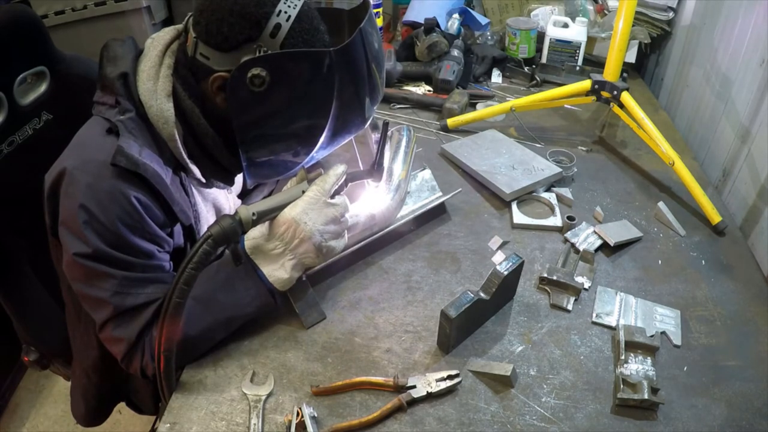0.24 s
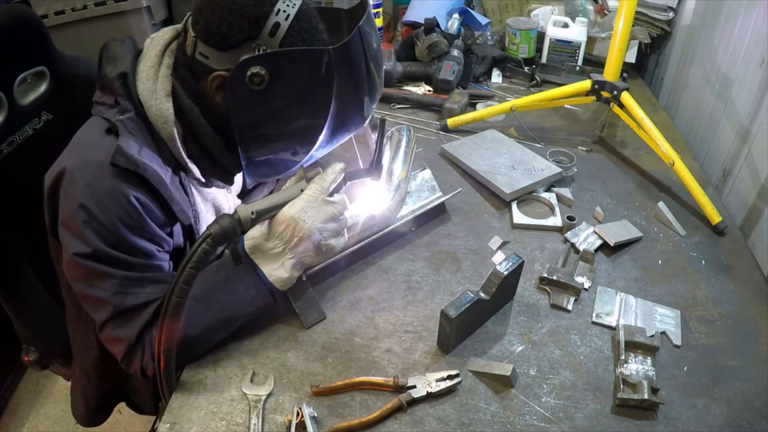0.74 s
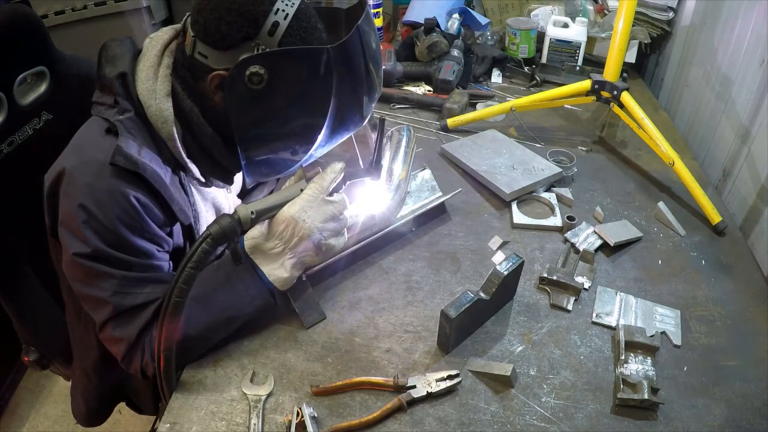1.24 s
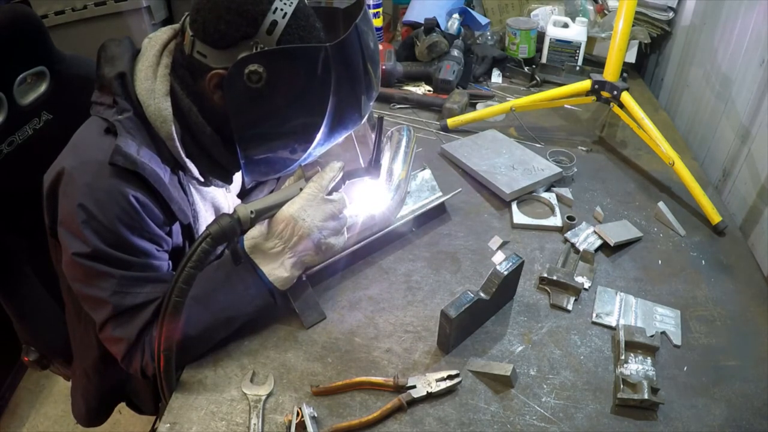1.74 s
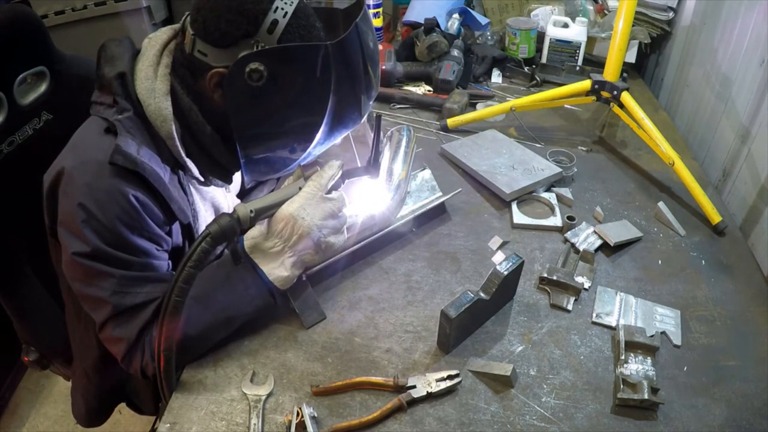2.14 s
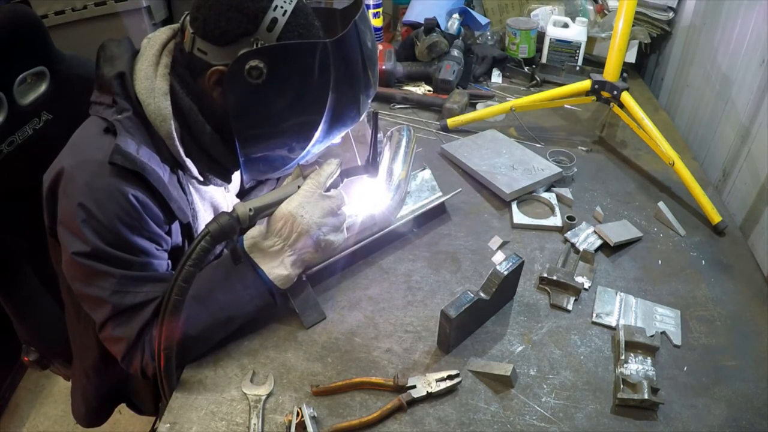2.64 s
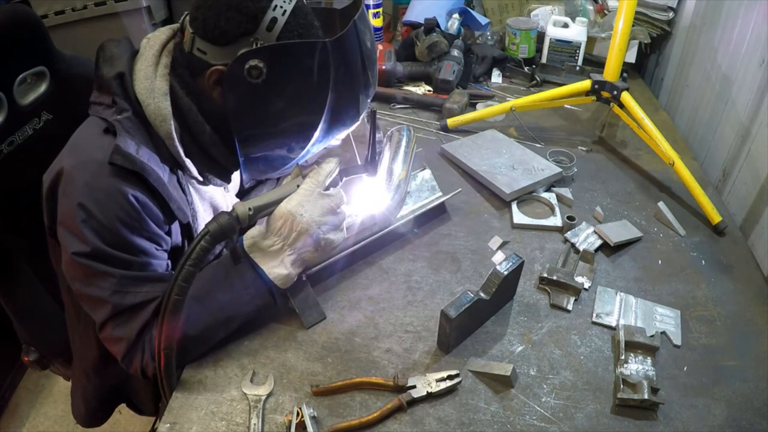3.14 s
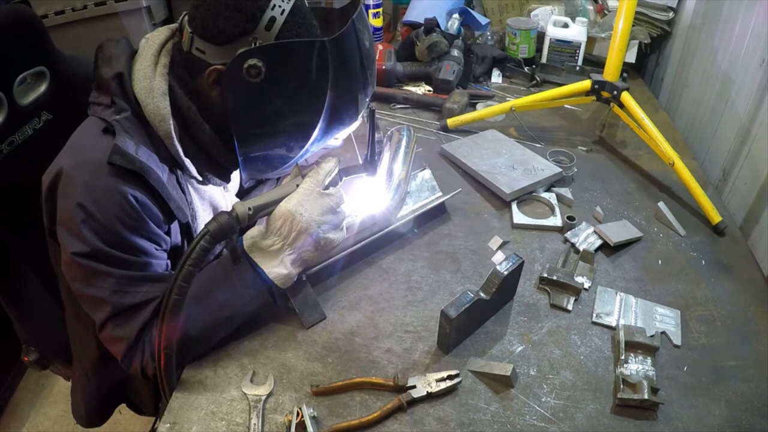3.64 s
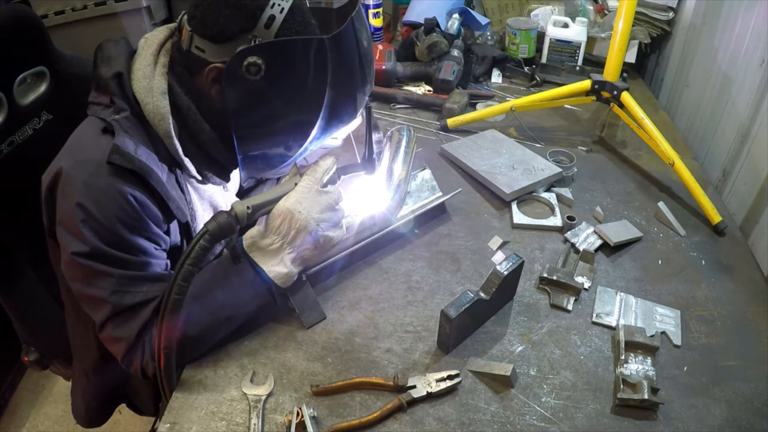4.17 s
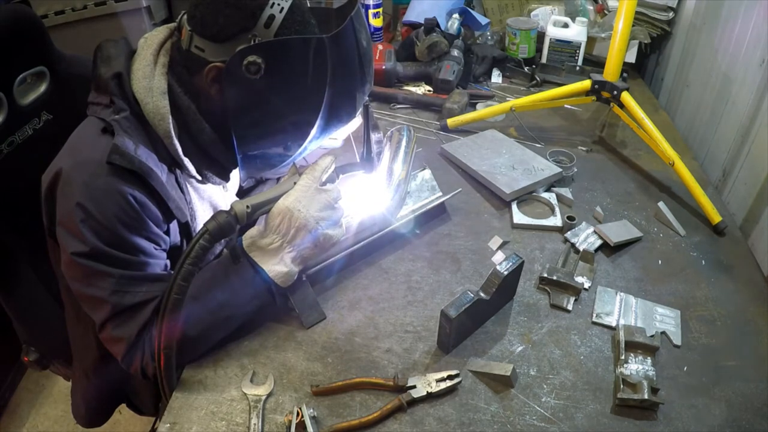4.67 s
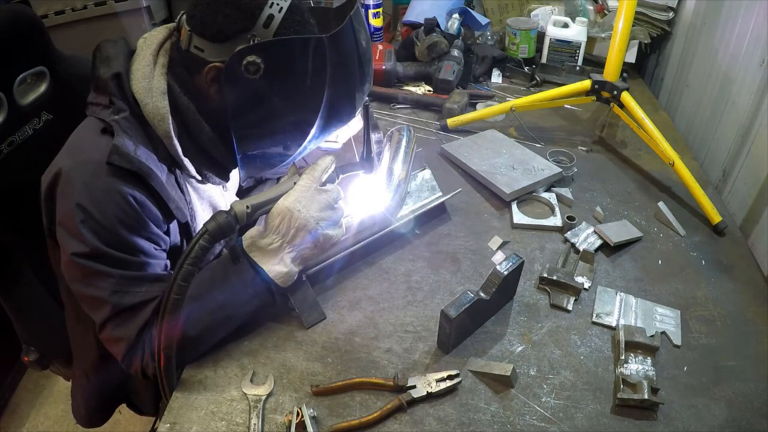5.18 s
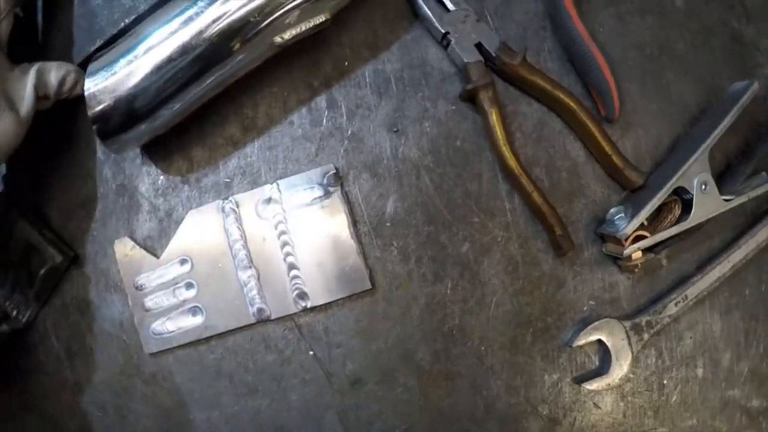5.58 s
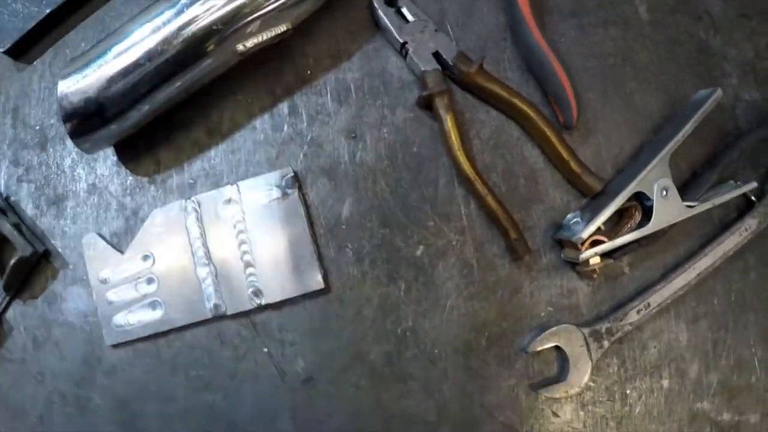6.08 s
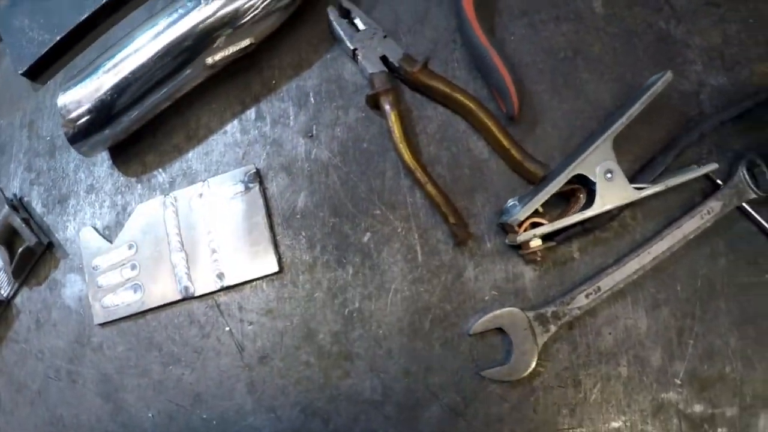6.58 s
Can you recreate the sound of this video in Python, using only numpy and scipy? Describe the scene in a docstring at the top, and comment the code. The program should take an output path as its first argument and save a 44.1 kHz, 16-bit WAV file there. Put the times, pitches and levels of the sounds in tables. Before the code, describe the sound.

Loud raspy arc-welding buzz with crackling spits and fan whir stops dead, followed by bumps, a short metal scrape, bright clinks and a faint ping.

```python
"""A hard AC TIG buzz opens the scene, sputtering over the air and blade tones of the welder's cooling fan.
Each current reversal is a click that excites resonances around the arc, with an echo off the helmet;
restless spells of the puddle make the restrikes uneven and crack with bursts of bright noise.
The sound of arc and fan ends abruptly; gloves and bumps follow, as enveloped noise, and a tube scrapes over
the bench as grainy noise. Its rim clinks and a tool pings faintly, both as sums of decaying sines."""
import sys
import numpy as np
from scipy import signal
from scipy.fft import rfft, irfft
from scipy.io import wavfile
from scipy.ndimage import map_coordinates

SR = 44100
rng = np.random.default_rng(int(sys.argv[2]) if len(sys.argv) > 2 else 0)


def digitize_waveform(pressure):
    """Quantize a signal to 16-bit integers and store it at the path in sys.argv[1].

    Rows of a 2-D input are taken as channels; values are limited to [-1, 1].
    """
    field = np.atleast_2d(pressure).T
    bounded = np.clip(field, -1, 1)
    quanta = np.round(bounded * 32767).astype(np.int16)
    wavfile.write(sys.argv[1], SR, quanta)


N = 300446
T = np.arange(N) / SR

# resonances around the arc, each strongest when the torch passes one place on the seam:
# f/Hz, width/Hz, level/dB, strongest at t/s, time from there to half strength/s, signed gain factor
ARC_RESONANCES = [(918, 119, 5.5, 2.5, 5.7, 1), (1380, 56, 5, 2, 3.8, -1.06),
                  (1788.6, 31, 11.5, 2, 5.4, 0.93), (2080, 26, 7.5, -2.5, 5.3, -1.5),
                  (2650.4, 30.8, 17, 1, 7.1, 1), (2700, 188, 14, 1.5, 5.7, -0.93),
                  (3324, 131, 12.5, 2.5, 3.75, 0.93), (3492, 510, 4.5, 3, 3.3, -1.06),
                  (4091, 171, 15.5, 3.5, 5.3, 0.97), (4099.4, 53, 18, 2.5, 8.3, -1),
                  (4626, 42, 19.0, 4.5, 1.95, 1), (4828, 214, 11.5, 5, 3.1, -0.99),
                  (5046, 59, 12.5, 5, 3.9, 0.95), (5670, 45, 7.5, -1, 4.2, -1.02),
                  (6228, 45, 12, 9.5, 10.5, 0.93), (6910, 134, 9.5, 4.0, 1.9, -1.06),
                  (7870, 35, 13.5, 2.5, 1.65, 0.95), (8524, 32, 11, 1, 6.2, -0.94),
                  (9096, 30, 15.5, 3.5, 5.5, 0.97), (9880, 52, 14, 8.5, 8, -1.14),
                  (10163, 39, 10.5, 0.0, 1.9, 0.96), (10910, 33, 14, 0.5, 0.96, -1.1),
                  (11120, 108, 16, 5.5, 3.2, 0.81), (11847, 45, 18.5, 3, 2.1, -0.92),
                  (12350, 250, 4, 0.5, 3.8, 0.64), (12200, 2300, -5.5, 3, 3.3, 0.79),
                  (12700, 120, 0, 10.5, 6, -0.75), (13250, 47, 12, 5.4, 8.0, 0.89),
                  (14200, 160, 9, 3, 2, -0.96), (14690, 43, 16.5, 0, 4.2, -1.07)]
# spells in which the puddle is restless and the arc sputters: start t/s, length/s, level/dB
RESTLESS_SPELLS = [(0.021, 0.75, -26), (0.893, 0.36, -27), (1.587, 0.62, -26), (2.262, 0.373, -26),
                   (2.8, .1, -35), (3.07, .1, -29), (3.326, 0.066, -27.5), (3.674, .3, -28.5),
                   (4.782, 0.069, -40), (4.947, 0.042, -27.5)]
# single restrikes that snap at a level of their own: t/s, level/dB
HARD_SNAPS = [(.105, -19.5), (1.589, -18), (2.886, -27), (3.316, -25), (3.33, -21), (3.394, -19)]
# bright crack of a restrike, and the duller wash of its reflections: f/Hz, level/dB
CRACK_COLOUR = [(1500, -17.0), (3000, 1.0), (7500, -10), (11000, -3), (14500, 9.0), (16500, -25)]
WASH_COLOUR = [(1000, -20.0), (2200, -6), (4000, -1.5), (7000, 1.5), (12000, 3.5), (15000, -13.0),
               (16500, -20.0)]
# fan blade tone and its multiples: multiple of the blade rate, level/dB
BLADE_TONES = [(1, -38.5), (2, -45.5), (4, -48.5), (5, -46)]
# air through the welder's case: f/Hz, level/dB
FAN_AIR_COLOUR = [(60, -11), (130, -14.5), (180, 2.5), (250, -1.5), (345, -12), (440, -7.5), (515, -9),
                  (620, -0.5), (750, -9), (860, -7), (1200, -20.5), (1600, -21), (2200, -17), (9000, -43)]
# rumble of the workshop: f/Hz, level/dB
RUMBLE_COLOUR = [(20, -7.5), (30, 1), (45, -5), (65, -21.5), (120, -22.5), (300, -34)]
# slow swells of that rumble: t/s, level/dB
RUMBLE_SWELLS = [(0, -43), (.8, -46.5), (1.9, -37.5), (3.1, -47.5), (4.3, -50), (5.1, -41), (6.8, -46.5)]
# hiss of the workshop: f/Hz, level/dB
HISS_COLOUR = [(100, 6.5), (300, -8.5), (1000, -9.5), (4000, -10), (10000, -23), (15000, -25)]
# dull bumps of hands and tube: t/s, level/dB, f/Hz
DULL_BUMPS = [(5.410, -35, 500), (5.445, -37, 1500), (5.465, -54, 1200), (5.513, -42, 400),
              (5.598, -29, 400), (6.109, -46, 700), (6.168, -37, 756), (6.265, -42, 810),
              (6.311, -45, 1500), (6.644, -45, 1000)]
# strokes of the gloves on the metal: start t/s, length/s, level/dB
GLOVE_STROKES = [(5.433, .028, -48), (6.1, .32, -51.5), (6.65, .2, -51)]
# leather on metal: f/Hz, level/dB
GLOVE_COLOUR = [(150, 8), (400, -3.5), (900, -3), (2000, -7), (5000, -8), (8000, -16), (14000, -31)]
# touches on the tool: t/s, level/dB
TOOL_TOUCHES = [(6.385, -45), (6.393, -41)]
# modes of the tool: f/Hz, t60/s, level/dB
TOOL_MODES = [(2080, 0.72, -13), (2030, 0.092, 10), (3090, .12, -3), (4915, .17, -9), (6471, .22, -14)]
# boom of the bench top under the sliding tube: f/Hz, level/dB
BOOM_COLOUR = [(80, -26), (130, -5), (170, 3), (240, -2.5), (330, -17), (600, -30)]
# scrape of metal on metal: f/Hz, level/dB
SCRAPE_COLOUR = [(250, 4), (500, -3), (900, 3), (1500, -2.5), (2700, -4.5), (4200, -12.5), (7000, -21),
                 (10000, -47), (14000, -39)]
# modes of the tube: f/Hz, t60/s, level/dB
TUBE_MODES = [(2390, 0.033, 7), (2680, 0.051, -6), (3000, 0.043, 0), (3890, 0.093, 4.5), (5130, 0.058, -11),
              (5660, 0.19, -5.5), (6761, 0.096, -17), (7100, 0.038, 2), (9900, 0.14, -13),
              (11300, .18, -27), (12890, .2, -19), (13800, .15, -16)]
# the tube's rim striking the bench: t/s, ring level/dB, crack level/dB, most excited f/Hz
RIM_STRIKES = [(5.650, -15.5, -21.5, 2660), (5.685, -23, -31, 2850), (5.698, -13, -19, 7700),
               (5.727, -18, -16.5, 5600), (5.752, -27, -28, 4970), (5.828, -42, -31, 3900),
               (5.852, -35, -31, 4220)]
# crack of rim on bench: f/Hz, level/dB
STRIKE_COLOUR = [(600, -19), (1800, -10), (2700, 1.5), (3800, -2), (6000, -4.5), (9000, -18), (14000, -40)]

AC_HZ = 202.735
CLEANING_SHARE = .2697  # part of each cycle between the weak reversal and the restrike
WELDING_ENDS_S, BACKGROUND_RETURNS_S = 5.351, 5.4
# one shove of the tube: it starts, gathers speed, slides on and stops
SHOVE_S, FULL_SPEED_S, STOP_S = 5.51, 5.66, 5.845


def undb(db):
    """Decibels to gain."""
    return 10 ** (np.asarray(db) / 20)


def unit(x):
    """Scale to rms 1."""
    return x / np.sqrt(np.mean(x ** 2))


def noise():
    """White noise."""
    return rng.standard_normal(N)


def walk(rate):
    """Random drift: straight lines between normal draws, rate of them a second."""
    points = rng.standard_normal(N)
    return np.interp(T * rate, np.arange(N), points)


def colour(x, points):
    """Weight the spectrum of x by (f/Hz, level/dB) points, at rms 1."""
    hz, db = np.transpose(points)
    f = np.maximum(np.arange(N // 2 + 1) * SR / N, 1)
    # roll off an octave outside the outer points
    low_end = 1 + (hz[0] / 2 / f) ** 2
    high_end = 1 + (f / hz[-1] / 2) ** 2
    gain = undb(np.interp(np.log(f), np.log(hz), db)) / np.sqrt(low_end * high_end)
    return unit(irfft(rfft(x) * gain, N))


def resonate(x, hz, width):
    """Two-pole resonance, gain 1 at the centre."""
    b, a = signal.iirpeak(hz, hz / width, fs=SR)
    return signal.lfilter(b, a, x + 1e-18)  # the offset keeps the decay out of denormal numbers


def highpass(x, order, hz):
    """Butterworth high-pass."""
    return signal.sosfilt(signal.butter(order, hz, "highpass", fs=SR, output="sos"), x)


def hump(t, middle, width):
    """A smooth rise to 1 and fall around one moment."""
    return np.exp(-((t - middle) / width) ** 2)


def held(t, start, length, attack, release):
    """Envelope that reaches 1 at the start, holds for the length and decays with time constant release."""
    rise = np.clip(1 + (t - start) / attack, 0, 1)
    return rise * np.exp(-np.maximum(t - start - length, 0) / release)


def fade(start, t60):
    """Sudden onset and exponential decay."""
    return (T >= start) * np.exp(-np.log(1000) * np.clip((T - start) / t60, 0, 10))


def reflections(x, t60):
    """Dense, short echo of bench and walls: convolution with decaying noise."""
    tail = noise() * fade(0.00204, t60)
    return signal.fftconvolve(x, tail[:SR] / np.sqrt(np.sum(tail ** 2)))[:N]


def ring(start, modes, weights):
    """Decaying modes of a struck object, as one second of sines."""
    t, out = T[:SR], np.zeros(N + SR)
    first = int(start * SR)
    for (hz, t60, db), weight in zip(modes, weights):
        decay = undb(db - 60 * t / t60)
        out[first:first + SR] += weight * decay * np.sin(2 * np.pi * hz * t)
    return out[:N]


def clicks(times, sizes, size=8):
    """Sharp clicks placed between the samples, as windowed sincs."""
    at = np.floor(times * SR).astype(int)[:, None] + np.arange(1 - size, size + 1)
    offset = at - times[:, None] * SR
    shape = np.sinc(offset) * np.cos(np.pi * offset / size / 2) ** 2
    return np.bincount(np.clip(at, 0, N - 1).ravel(), (shape * sizes[:, None]).ravel(), N)


def cycle_times():
    """Moments at which the arc restrikes, once per AC cycle."""
    return np.arange(.18 / AC_HZ, WELDING_ENDS_S, 1 / AC_HZ)


def unrest(times, calm_db=-34, heating_db_per_s=-1.2, rock_hz=13.3, rock_jitter=0.093,
           spit_db=4.0, spit_s=0.014, between_db=-4.5):
    """Restrike roughness: a calm bed that falls as the metal heats, and spells that spit as the puddle rocks."""
    size = undb(calm_db + heating_db_per_s * times)
    wobble = rock_jitter * np.interp(times, T, walk(rock_hz))
    for start, length, db in RESTLESS_SPELLS:
        swings = (times - start) * rock_hz + wobble - np.interp(start, times, wobble)
        # each swing spits, then the arc takes a few cycles to settle
        spit = undb(spit_db) * np.exp(-(swings % 1) / rock_hz / spit_s)
        spell = undb(db) * held(times, start, length, attack=0.017, release=.025)
        size = np.maximum(size, spell * np.maximum(spit, undb(between_db)))
    return size


def helmet_echo(x, far_s=.00167, near_s=.001505, lean_s=1.8, lean_takes_s=.45):
    """Echo off the helmet; the welder leans in once, and the shortening path moves its comb filtering."""
    leaning = (1 + np.tanh((T - lean_s) / lean_takes_s)) / 2
    delay = far_s + (near_s - far_s) * leaning
    return map_coordinates(x, [(T - delay) * SR], order=3)


def buzz(direct=0.66, back_swing=0.55, scatter=2.3, echo=0.076, gain_db=0.63, bass_hz=443.0, waver_db=0.22):
    """A click at each restrike, and a weaker opposite one at the reversal before it, ring the surroundings."""
    times = cycle_times()
    # the torch is once held a little further off, and the longer arc buzzes louder
    lift_db = 0.9 * hump(times, middle=3.86, width=0.19)
    size = undb(gain_db + lift_db + waver_db * np.interp(times, T, walk(9)))
    # a restless puddle makes the restrikes uneven
    uneven = 1 + scatter * unrest(times) * rng.standard_normal(len(times))
    restrikes = clicks(times, size * uneven)
    pulses = restrikes - back_swing * clicks(times - CLEANING_SHARE / AC_HZ, size)
    # a small arc radiates little bass
    out = direct * highpass(pulses, 2, bass_hz)
    for hz, width, db, best_s, reach_s, polarity in ARC_RESONANCES:
        coupling = undb(db) / (1 + ((T - best_s) / reach_s) ** 2)
        out = out + polarity * coupling * resonate(pulses, hz, width)
    return out + echo * helmet_echo(out)


def shimmer(x, depth_db=-12.0, slow_per_s=2.33, quick_per_s=18.0, quick_share=0.48, longest_s=.003,
            above_hz=3600.0, count=6):
    """Weak reflections off torch, gloves and tube come and go as the arc wanders, so the treble flickers."""
    treble = highpass(x, 1, above_hz)
    out = x
    for delay in longest_s * (np.arange(count) + rng.random(count)) / count:
        drift = walk(slow_per_s) + quick_share * walk(quick_per_s)
        strength = undb(depth_db) / np.sqrt(count) * drift
        out = out + strength * np.roll(treble, int(delay * SR) + 1)
    return out


def sputter(scatter_db=4.0, crack_s=0.00031, crack_db=-3.5, wash_db=-1.0, wash_t60=0.046):
    """Each restrike cracks as a noise burst, the harder the more restless the puddle is; a few snap out."""
    times = cycle_times()
    size = unrest(times) * undb(scatter_db * np.clip(rng.standard_normal(len(times)), -2, 2))
    for start, db in HARD_SNAPS:
        size[np.argmin(abs(times - start))] = undb(db)
    # each crack lasts a fraction of the cycle; its reflections fill the gaps
    since_restrike = (T - times[0]) % (1 / AC_HZ)
    gate = unit(np.exp(-since_restrike / crack_s)) * np.interp(T, times, size)
    crack = colour(noise(), CRACK_COLOUR) * gate
    wash = reflections(colour(noise(), WASH_COLOUR) * gate, wash_t60)
    return undb(crack_db) * crack + undb(wash_db) * wash


def fan(blade_hz=273.2, air_db=-31.0, air_db_per_s=-0.31, gust_db=2.0, waver_db=-1.5):
    """Wavering blade tones, and gusty air through the welder's case that slowly eases."""
    turn = 2 * np.pi * np.cumsum(blade_hz * (1 + 0.000542 * walk(2.96))) / SR
    tones = 0
    for multiple, db in BLADE_TONES:
        tone = np.sqrt(2) * np.sin(multiple * turn)
        tones = tones + undb(db + waver_db * walk(4.2)) * tone
    air_gain = undb(air_db + air_db_per_s * T + gust_db * walk(4.72))
    return tones + air_gain * colour(noise(), FAN_AIR_COLOUR)


def workshop(hiss_db=-54.0):
    """Low, slowly swelling rumble with a little hiss, both shaped noise."""
    swell = undb(np.interp(T, *np.transpose(RUMBLE_SWELLS)))
    return colour(noise(), RUMBLE_COLOUR) * swell + undb(hiss_db) * colour(noise(), HISS_COLOUR)


def handling(bump_t60=0.052, grain_db=3.0, tick_db=-4.5):
    """Hands and tube bump the bench, gloves rub as grainy noise, a nudged tool ticks and rings its modes."""
    bumps, strokes, pings, touches = 0, 0, 0, 0
    for start, db, hz in DULL_BUMPS:
        thud = unit(resonate(resonate(noise(), hz, hz), hz, hz))
        bumps = bumps + undb(db) * thud * fade(start, bump_t60)
    for start, length, db in GLOVE_STROKES:
        strokes = strokes + undb(db) * held(T, start, length, attack=0.036, release=0.015)
    rub = colour(noise() * undb(grain_db * walk(200)), GLOVE_COLOUR) * strokes
    for start, db in TOOL_TOUCHES:
        pings = pings + undb(db) * ring(start, TOOL_MODES, np.ones(len(TOOL_MODES)))
        touches = touches + undb(db + tick_db) * fade(start, .08)
    ticks = touches * unit(resonate(noise(), 2800, 1400))
    return rub + bumps + pings + ticks


def shove(db, rise_db, t60, grip_s=0.017):
    """Gain of a sliding sound: it climbs rise_db to db with the tube's speed, holds, and decays after the stop."""
    speed = np.clip((T - SHOVE_S) / (FULL_SPEED_S - SHOVE_S), 0, 1)
    sliding = held(T, SHOVE_S, STOP_S - SHOVE_S, grip_s, t60 / np.log(1000))
    return undb(db + rise_db * (speed - 1)) * sliding


def drag(grain_db=2.5, ring_db=-21.0):
    """Stick and slip of the tube: dense grains scrape and keep its modes singing, over a booming bench top."""
    grains = noise() * undb(grain_db * walk(500))
    singing = 0
    for hz, t60, db in TUBE_MODES:
        width = np.log(1000) / np.pi / t60
        singing = singing + undb(db) * np.sqrt(t60) * resonate(grains, hz, width)
    metal = colour(grains, SCRAPE_COLOUR) + undb(ring_db) * unit(singing)
    scrape = metal * shove(db=-30.5, rise_db=19, t60=0.24)
    # the tube's weight comes down on the bench just before it stops
    settle = undb(8.5 * hump(T, middle=5.825, width=0.041))
    boom = colour(noise(), BOOM_COLOUR) * shove(db=-32, rise_db=27, t60=0.6) * settle
    hollow = unit(resonate(resonate(noise(), 315, 350), 330, 380)) * shove(db=-33.5, rise_db=6.2, t60=0.3)
    return boom + hollow + scrape


def clinks(spread_octaves=0.25, spill=0.066, crack_t60=0.039):
    """The rim strikes the bench with a noise crack; where it touches decides which modes ring most."""
    out, mode_hz = 0, np.array(TUBE_MODES)[:, 0]
    crack = colour(noise(), STRIKE_COLOUR)
    for start, ring_db, crack_db, hz in RIM_STRIKES:
        weights = spill + np.exp(-(np.log2(mode_hz / hz) / spread_octaves) ** 2)
        out = out + undb(ring_db) * ring(start, TUBE_MODES, weights)
        out = out + undb(crack_db) * crack * fade(start, crack_t60)
    return out


def scene(wet_db=-8.0):
    """Welding, a moment of near silence, then the work on the bench."""
    welding = np.clip((WELDING_ENDS_S - T) * 1000, 0, 1)  # closes over 1 ms
    afterwards = np.clip((T - BACKGROUND_RETURNS_S) * 100, 0, 1)  # opens over 10 ms
    arc_and_fan = welding * (shimmer(buzz()) + sputter() + fan())
    # the background is nearly silent for a moment between the two
    background = workshop() * np.maximum(.13, welding + afterwards)
    bench = handling() + drag() + clinks()
    bench = bench + undb(wet_db) * reflections(bench, t60=0.27)
    return (arc_and_fan + bench + background)[None]


def record(dry):
    """The microphone's top end is cut steeply, by an elliptic low-pass."""
    return signal.sosfilt(signal.ellip(10, .2, 70, 15250, fs=SR, output="sos"), dry)


dry = scene()
out = record(dry)
digitize_waveform(out)
```